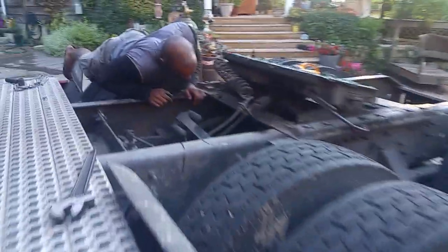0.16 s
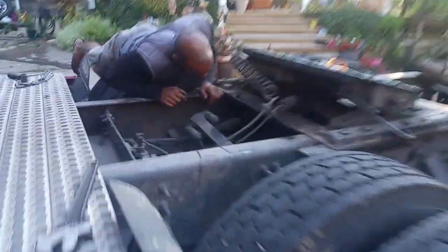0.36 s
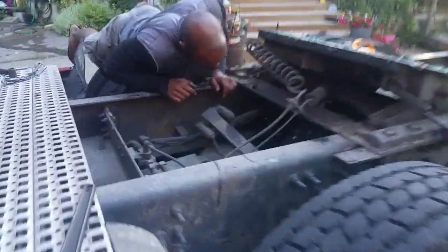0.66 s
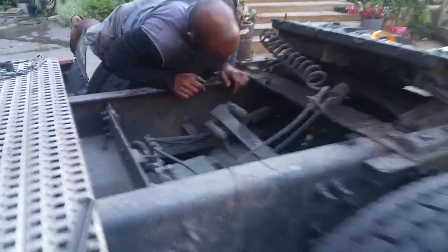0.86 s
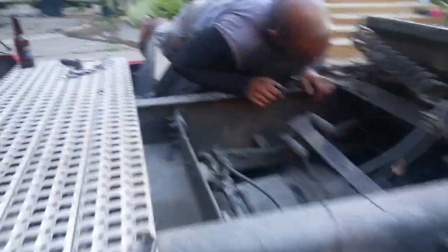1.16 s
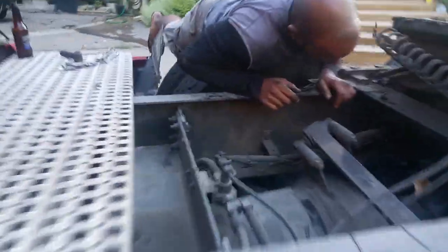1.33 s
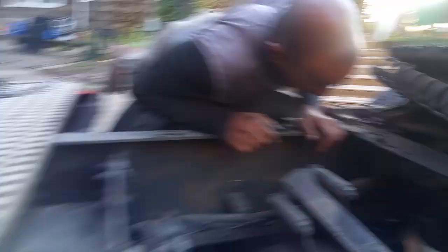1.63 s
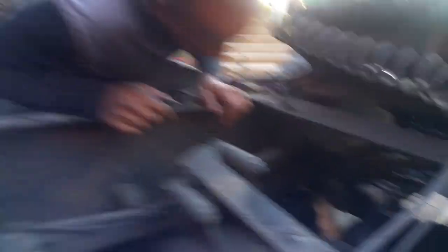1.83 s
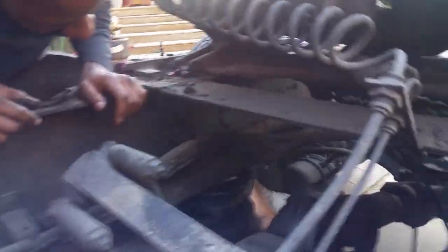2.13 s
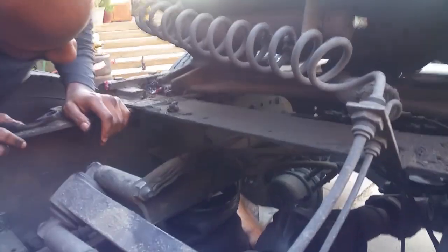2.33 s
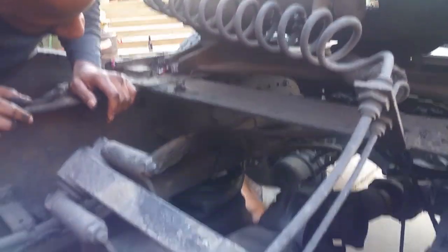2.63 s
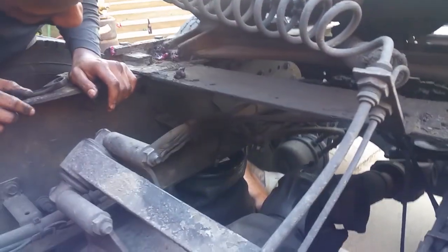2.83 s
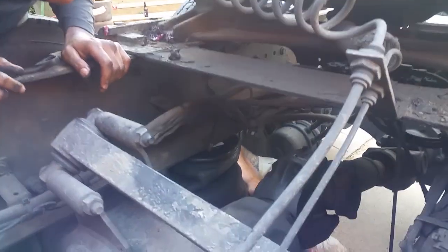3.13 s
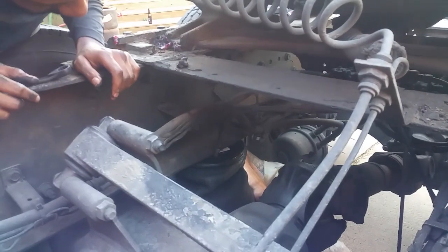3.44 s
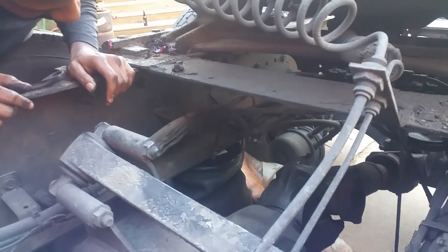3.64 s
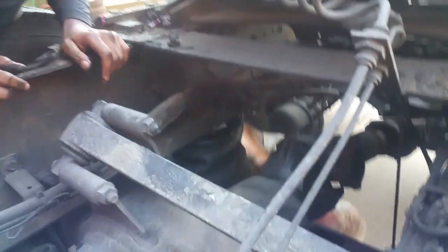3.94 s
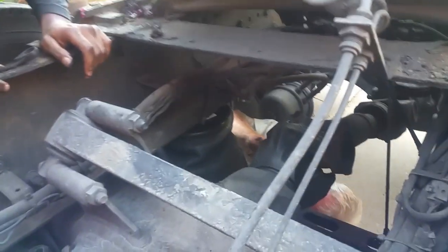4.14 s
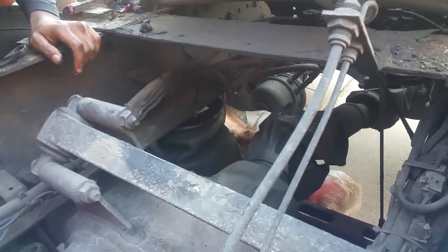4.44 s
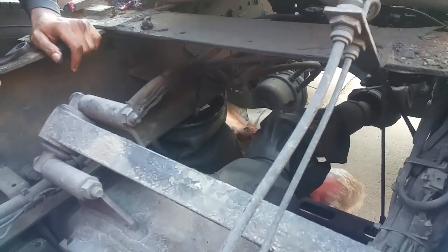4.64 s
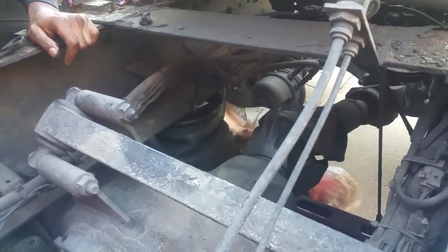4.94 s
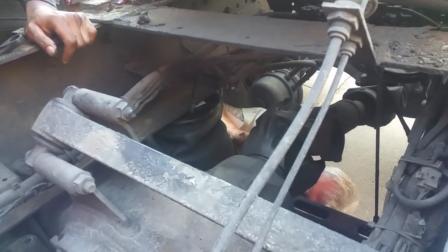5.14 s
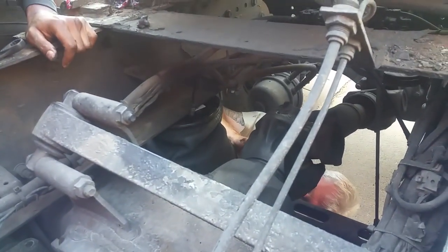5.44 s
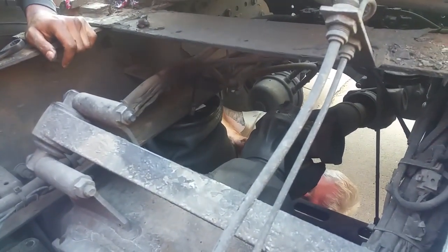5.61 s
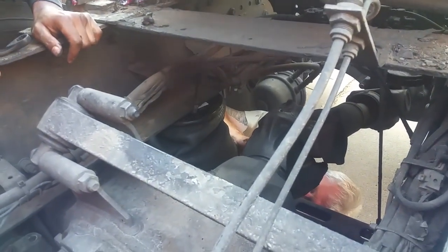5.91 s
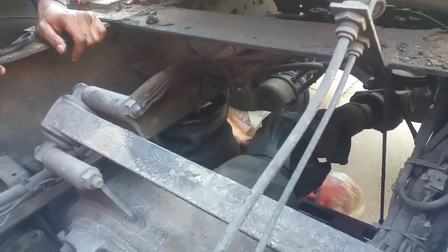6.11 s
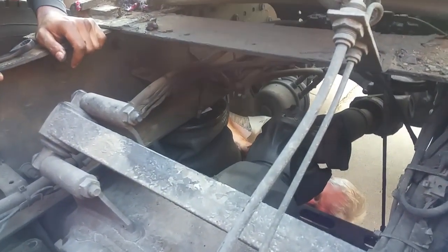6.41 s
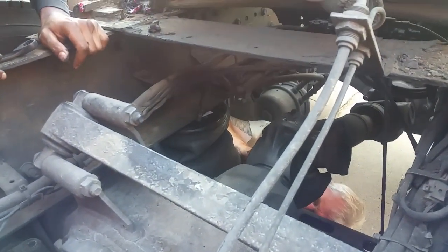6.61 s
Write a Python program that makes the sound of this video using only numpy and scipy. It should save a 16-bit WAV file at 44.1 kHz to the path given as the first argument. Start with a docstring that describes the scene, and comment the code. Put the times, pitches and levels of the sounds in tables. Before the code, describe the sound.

Outdoors in a yard, a handheld stereo microphone approaches a truck chassis leaking compressed air. From 0 s a bright, turbulent hiss is already present, thin and leaning right, over a soft broad low roar. Between about 0.2 and 0.4 s low wind buffets thump mainly on the left; more come at 0.6-0.75 s, together with three quick dull plastic knocks of the handled device near 0.7 s. Further wind bumps and a weak, brighter tick occur around 1.0-1.4 s. The hiss swells steadily, shifting colour as the microphone swings in, and reaches full strength near 2 s. It then holds loud and sizzling to the end at about 6.8 s, wavering slightly around 2.7-4 s, its timbre altering as the microphone tilts. Only faint scattered buffets and light wind remain, with a barely audible low hum around 4.7-5.2 and 5.5-6.2 s.

```python
"""Air escaping from a suspension line

Compressed air leaves a truck's suspension line as a loud turbulent hiss: noise coloured by a jet spectrum.
A hand-held camera walks up, swings over the frame and settles; its pose recolours the hiss at two ports.
Below it lie a broad low roar, wind rumble with decaying-sine buffets, damped modal knocks of the camera
body and a faint narrow-band hum that sounds twice.
"""
import sys
import numpy as np
from scipy import signal
from scipy.io import wavfile
from scipy.ndimage import uniform_filter1d

SR = 44100
rng = np.random.default_rng(int(sys.argv[2]) if len(sys.argv) > 2 else 0)


def digitize_waveform(pressure):
    """Quantize a signal to 16-bit integers and store it at the path in sys.argv[1].

    Rows of a 2-D input are taken as channels; values are limited to [-1, 1].
    """
    field = np.atleast_2d(pressure).T
    bounded = np.clip(field, -1, 1)
    quanta = np.round(bounded * 32767).astype(np.int16)
    wavfile.write(sys.argv[1], SR, quanta)


N = 298557
SIZE, HOP = 1024, 256  # short-time spectrum: window and step (samples)

# Where the camera points; positions between whole numbers blend two poses.
# Each row: time in seconds, pose (0 far, 1 closer, 2 swinging, 3 over the frame, 4 tilted down).
POSE_PATH = [(0, 0), (.45, 0), (.8, 1), (.95, 1), (1.3, 2), (1.72, 2), (2.1, 3), (3.6, 3), (4.4, 4),
             (6.77, 4)]


def gain_of(db):
    """Level law: decibels to an amplitude ratio."""
    return 10 ** (np.asarray(db) / 20)


def evened(x):
    """Power normalization: scales a signal to rms 1."""
    return x / np.sqrt(np.mean(abs(x) ** 2) + 1e-20)


def read(points, hz):
    """Spectral envelope: joins levels linearly along a log-frequency axis."""
    f, value = np.transpose(points)
    return np.interp(np.log(hz + 1), np.log(f + 1), value)


def follow(rows, t):
    """Time envelope: interpolates every column of a curve at the times t."""
    s, *columns = np.transpose(rows)
    return np.array([np.interp(t, s, c) for c in columns])


def add(mix, s, sound):
    """Superposition: sums a sound into the mix at s seconds."""
    part = mix[:, round(s * SR):][:, :sound.shape[1]]
    part += sound[:, :part.shape[1]]


def grid():
    """Short-time analysis grid: bin frequencies in Hz and frame times in seconds."""
    return np.fft.rfftfreq(SIZE, 1 / SR), np.arange(N // HOP + 5) * HOP / SR


def noise_pair(coherence):
    """Partial coherence: two Gaussian noise spectra share a part set by a complex coherence."""
    hz, t = grid()
    a, b, c, d = rng.standard_normal((len(t), len(hz), 4)).T
    right = a + 1j * b
    independent = c + 1j * d
    left = coherence * right + np.sqrt(1 - abs(coherence) ** 2) * independent
    return np.array([left, right])


def sound_of(z, colour_db):
    """Filtered noise: colours spectra at constant expected frame power, returns rms-1 channels."""
    gain = gain_of(colour_db)
    gain_rms = np.sqrt((gain ** 2).mean(-2, keepdims=True))
    x = signal.istft(z * gain / gain_rms, nperseg=SIZE, noverlap=SIZE - HOP)[1]
    return np.array([evened(c[:N]) for c in x])


def smooth_chance(shape, *spans):
    """Correlated randomness: a Gaussian field averaged twice over a span along each axis, rms 1."""
    x = rng.standard_normal(shape)
    for axis, span in enumerate(spans):
        for _ in range(2):
            x = uniform_filter1d(x, int(span), axis)
    return evened(x)


def pose_share():
    """Linear crossfade: the share of each of five poses in each frame."""
    return np.maximum(1 - abs(follow(POSE_PATH, grid()[1]) - np.arange(5)[:, None]), 0)


def hum():
    """Narrow-band noise: a one-pole random envelope shifted to the hum frequency, alike at both ports."""
    # The faint hum. Each row: middle of the fade-in in seconds, middle of the fade-out in seconds, level in dB.
    hum_spans = [(4.65, 5.2, -56), (5.5, 6.25, -52)]
    centre_hz, width_hz, fade_s = 154.6, 2.8, .2
    t = np.arange(N) / SR
    pole = np.exp(-np.pi * width_hz / SR)
    drive = rng.standard_normal(N) + 1j * rng.standard_normal(N)
    envelope = signal.lfilter([1], [1, -pole], drive)
    tone = (envelope * np.exp(2j * np.pi * centre_hz * t)).real
    level = 0
    for start, end, db in hum_spans:
        level = level + gain_of(db) * np.clip(np.minimum(t - start, end - t) / fade_s + .5, 0, 1)
    return evened(tone) * level


def wind(lumpy_db=2.5):
    """Turbulent pressure: lumpy low-frequency noise, incoherent between the ports."""
    # Wind, strong while the camera moves, a light breeze after.
    # Each row: time in seconds, left level in dB, right level in dB, both before the lumps.
    wind_levels = [(0, -43.5, -49), (.7, -36, -47), (1, -43, -48), (1.4, -42.5, -49), (1.75, -53, -58),
                   (4.5, -65, -57), (5.3, -51, -55), (5.7, -63, -57), (6.77, -58, -52)]
    # Spectrum of the rumble. Each row: frequency in Hz, relative density in dB per Hz.
    wind_spectrum = [(20, -24), (45, -4), (70, 4.5), (130, -12), (250, -7), (500, -35), (1000, -60)]
    rumble = sound_of(noise_pair(0), read(wind_spectrum, grid()[0])[None, :, None])
    lumps = lumpy_db * smooth_chance((N, 2), 500).T
    return rumble * gain_of(follow(wind_levels, np.arange(N) / SR) + lumps)


def roar(coherence, patchy_db=1.5):
    """Broadband low noise of jet and yard: partly coherent at the ports, louder over the frame."""
    # Spectrum of the roar. Each row: frequency in Hz, relative density in dB per Hz.
    roar_spectrum = [(25, -24), (60, -3), (140, -3.5), (300, -3), (680, 0), (1100, 0), (1550, -1),
                     (1900, -10), (2600, -12), (4000, -60)]
    # Balance of the ports within the spectrum. Each row: frequency in Hz, left over right in dB.
    roar_balance = [(60, 1), (250, -3), (600, -4), (1100, -4.5), (1600, -2)]
    far_db, near_gain_db = [[-41.5], [-39]], 1.78  # left and right level from afar, gain over the frame
    hz, t = grid()
    z = noise_pair(coherence)
    z *= gain_of(patchy_db * smooth_chance((len(t), len(hz)), 10, 5).T)
    side = np.array([.5, -.5])[:, None] * read(roar_balance, hz)
    x = sound_of(z, (read(roar_spectrum, hz) + side)[:, :, None])
    near = np.clip(follow(POSE_PATH, np.arange(N) / SR) - 2, 0, 1)
    return x * gain_of(far_db + near_gain_db * near)


def faint_buffets(count=14):
    """Random eddies: uniform times and levels, log-uniform frequencies, all leaning left."""
    typical_db, spread_db, lean_db = -34.5, 1, 4  # middle level, deviation either way, mean left over right
    low_hz, high_hz = 72, 180
    when, size, pitch, side = rng.random((count, 4)).T
    level_db = typical_db + spread_db * (2 * size - 1)
    hz = low_hz * (high_hz / low_hz) ** pitch
    return list(zip(when * N / SR, level_db, hz, 2 * side * lean_db))


def buffets(swings=1.04, rise_cycles=.3):
    """Transient response: each eddy pushes the diaphragm, a sine under a Gaussian decay."""
    # Strong buffets. Each row: start in seconds, level in dB of the sine before its envelope,
    # frequency in Hz, left over right in dB.
    strong_buffets = [(0.168, -26, 86.1, 16), (0.25, -21, 94.2, 22), (0.29, -26, 105, 14),
                      (0.309, -18, 83.4, 25), (0.338, -22, 140, 15), (0.359, -23, 205, 20),
                      (0.614, -23, 129, 17.5), (0.639, -17.5, 300, 24), (0.691, -27, 164, 15),
                      (0.728, -20, 88.8, 19), (1.018, -23, 127, 20.5), (1.029, -17.5, 230, 21),
                      (1.179, -25, 132, -14), (1.319, -26, 99.6, 15), (1.369, -29, 99.6, -14),
                      (2.632, -28, 259, 5), (3.31, -29, 62, 12), (3.327, -30, 127, 16),
                      (4.229, -28, 143, 14), (4.829, -31, 91.5, 17), (5.358, -30, 110, 6.5),
                      (5.479, -33, 70, 9)]
    out = np.zeros((2, N))
    for s, db, hz, pan_db in strong_buffets + faint_buffets():
        turns = hz * np.arange(4000) / SR
        # the Gaussian falls to 1/e after "swings" cycles
        envelope = np.exp(-(turns / swings) ** 2) * np.minimum(turns / rise_cycles, 1)
        port_db = db + np.minimum([[pan_db], [-pan_db]], 0)  # only the weaker port is lowered
        add(out, s, np.sin(2 * np.pi * turns) * envelope * gain_of(port_db))
    return out


def knocks(rise_s=.003, rattle=.3):
    """Modal decay: damped sines of the plastic body, roughened by loose parts, alike at both ports."""
    # Knocks. Each row: start in seconds, level in dB, extra level in dB of the modes above the first.
    knock_rows = [(0.667, -17, -7), (0.685, -20.5, -9), (0.706, -17, -10), (1.124, -30, 8)]
    # Modes of the camera body. Each row: frequency in Hz, relative level in dB, 60 dB decay time in seconds.
    body_modes = [(733, 4, 0.024), (1175, -1, 0.03), (1386, -1.5, 0.032)]
    out, t = np.zeros((2, N)), np.arange(2500) / SR
    for s, db, bright_db in knock_rows:
        ring = np.zeros(len(t))
        for k, (hz, mode_db, t60) in enumerate(body_modes):
            level_db = mode_db + min(k, 1) * bright_db - 60 * t / t60
            ring += gain_of(level_db) * np.sin(2 * np.pi * hz * t)
        ring *= 1 + rattle * smooth_chance(len(t), 30)
        add(out, s, gain_of(db) * ring * np.minimum(t / rise_s, 1) * gain_of([[-.5], [.6]]))
    return out


def port_relation(likeness=1.2, least=.08, wander=.2):
    """Interference: delayed copies sum to a complex coherence; its phase strays at random."""
    # Delayed copies that set how alike the ports are. Each row: lead of the left port in milliseconds,
    # then the relative weight far or closer, swinging, and over the frame or tilted.
    copy_rows = [(1.279, 0.04, -0.0, -0.05), (0.783, -0.09, -0.08, -0.09), (0.67, -0.06, -0.12, 0.02),
                 (0.603, -0.08, -0.0, -0.05), (0.453, 0.12, -0.02, 0.02), (0.292, 0.01, 0.07, 0.15),
                 (0.215, 0.11, -0.0, -0.13), (0.152, -0.01, 0.14, 0.01), (0.066, 0.0, 0.03, 0.15),
                 (0.035, 0.16, -0.01, -0.05), (-0.009, 0.08, -0.09, 0.1), (-0.072, -0.02, 0.14, 0.01),
                 (-0.168, 0.07, 0.11, 0.02), (-0.233, -0.0, 0.14, -0.02), (-0.391, 0.05, 0.01, 0.09),
                 (-0.526, -0.02, 0.09, -0.03), (-0.799, -0.02, 0.04, -0.06), (-1.544, 0.02, 0.01, 0.07)]
    hz, copies, share = grid()[0], np.array(copy_rows), pose_share()
    weights = copies[:, [1, 1, 2, 3, 3]] @ share
    total = np.exp(2j * np.pi * hz[:, None] * copies[:, 0] / 1000) @ weights
    stray = wander * smooth_chance((len(hz), len(share)), 4) @ share  # radians
    return np.clip(least + likeness * abs(total), 0, .8) * np.exp(1j * (np.angle(total) + stray))


def port_colour(jet, humps, share, ripple_db):
    """Spectral shaping: jet spectrum plus humps and a fine random ripple, blended between poses."""
    hz, humps = grid()[0], np.array(humps)
    shapes = np.exp(-2 * ((hz[:, None] - humps[:, 0]) / humps[:, 1]) ** 2)
    ripple = ripple_db * smooth_chance((len(hz), len(share)), 2)
    return read(jet, hz)[:, None] + (shapes @ humps[:, 2:] + ripple) @ share


def hiss(coherence, ripple_db=1.9, patchy_db=.8, tremor_db=.9, flutter_db=.25):
    """Turbulent jet noise: patches drift, hand tremor sways the treble, the jet itself flutters."""
    # Hiss as the camera nears, turns and sways. Each row: time in seconds, left level in dB, right level in dB.
    hiss_levels = [(0, -29.7, -23), (.3, -28, -19), (.6, -25, -17.5), (1.1, -22.5, -16.5),
                   (1.65, -23.5, -14), (2.05, -22.8, -12), (2.68, -22, -12.5), (2.85, -24, -13.5),
                   (3.03, -21.8, -12.4), (3.45, -24, -13.5), (3.65, -22.5, -12.5), (4.03, -23, -13.2),
                   (4.8, -22, -12.5), (4.97, -22, -13), (5.25, -22, -12.5), (6.2, -23, -12.6),
                   (6.45, -22, -11.7), (6.77, -23, -13)]
    # Broad jet spectrum at each port. Each row: frequency in Hz, relative density in dB per Hz.
    left_jet = [(500, -55), (1200, -22.6), (1800, -12.5), (2500.0, -9.5), (4000.0, -4.9), (6000.0, -9.2),
                (8000.0, -8.4), (11000.0, -8.2), (13500.0, -13.3), (15900.0, -17.1)]
    right_jet = [(500, -55), (1200, -31.8), (1800, -23.0), (2500.0, -21.0), (4000.0, -10.2), (6000.0, -7.7),
                 (8000.0, -6.4), (11000.0, -13.3), (13500.0, -17.3), (15900.0, -23.1)]
    # Humps and dips from frame and camera body. Each row: centre in Hz, width in Hz (two standard deviations),
    # then the height in dB far, closer, swinging, over the frame and tilted down.
    left_humps = [(2600, 180, -0.7, -1.7, -1.0, 2.7, 1.2), (3350, 340, -3.1, -2.9, 0.7, 2.4, 1.0),
                  (3600, 350, -1.3, 0.8, -1.1, -3.1, -3.7), (4420, 560, 5.3, 4.1, 3.4, 2.7, 0.8),
                  (4950, 340, 2.3, 6.0, 1.8, 2.6, 2.5), (5590, 690, 6.9, 6.8, 5.2, 6.2, 6.0),
                  (6130, 190, 3.6, 1.3, 2.2, 3.4, 1.8), (6800, 230, 1.4, -0.1, -1.2, -4.6, -4.8),
                  (7190, 200, -2.9, 0.5, 0.0, 3.0, 2.0), (7420, 130, -0.7, 0.3, -0.1, -5.0, -4.3),
                  (8490, 480, -3.0, -0.7, -1.7, -0.1, 1.8), (9290, 800, -1.2, -1.0, -4.4, -3.4, -2.5),
                  (9980, 540, 0.7, 0.3, -1.7, 3.0, 0.3), (11040, 360, -2.8, -1.6, -1.2, 1.1, 5.6),
                  (11900, 1330, -6.2, -3.9, -4.8, -2.2, -0.6), (13170, 840, 5.1, 4.9, 5.4, 5.5, 3.3),
                  (14260, 850, -3.5, -0.3, -2.4, 4.1, 5.8), (15250, 410, -2.1, -2.8, -0.8, 2.2, 2.7)]
    right_humps = [(2530, 370, 2.8, 0.8, 3.9, 1.0, 0.9), (3100, 530, 4.2, 3.7, 2.6, 1.8, 0.9),
                   (3940, 420, 1.9, -0.6, -2.7, -3.2, -4.4), (4500, 250, 7.2, 1.0, -1.9, -0.9, 1.6),
                   (4990, 190, 3.0, -0.3, -0.2, -4.0, -3.0), (5190, 930, -2.2, -0.5, 5.5, 0.0, 0.9),
                   (5250, 200, 3.8, -1.9, 0.7, -1.8, 2.0), (6080, 630, -1.6, 0.3, 0.4, -5.4, -7.8),
                   (6460, 200, -1.3, -5.7, 0.9, 2.3, 2.6), (7280, 780, 5.6, 3.1, -1.1, 5.0, 3.1),
                   (7780, 470, 2.3, 2.6, 1.8, 3.1, 2.6), (7970, 130, 1.7, -0.7, 0.8, -2.0, -0.5),
                   (8770, 1160, -4.4, -8.3, -1.8, 0.8, 0.9), (10110, 290, 10.3, 7.6, 7.1, 1.2, -0.9),
                   (10600, 380, 3.1, 5.9, 5.6, 0.2, -2.0), (10770, 1480, -0.4, -1.6, 1.0, 2.4, 7.8),
                   (12110, 750, -3.1, -7.3, -1.9, -3.6, -3.8), (13270, 940, 3.1, 1.8, 8.0, 0.9, -0.4),
                   (13540, 200, 0.2, 0.5, -2.0, 3.4, 2.9), (15330, 690, 1.8, -1.0, -1.6, 0.6, 3.3)]
    (hz, t), share = grid(), pose_share()
    colour = np.array([port_colour(left_jet, left_humps, share, ripple_db),
                       port_colour(right_jet, right_humps, share, ripple_db)])
    patches = smooth_chance((len(t), len(hz), 2), 12, 5).T
    # the tremor grows with frequency and has its stated depth at 13 kHz
    tremor = smooth_chance((len(t), len(hz), 2), 18, 50).T * hz[:, None] / 13000
    flutter = smooth_chance(len(t), 5)
    sway_db = patchy_db * patches + tremor_db * tremor + flutter_db * flutter
    z = noise_pair(coherence) * gain_of(sway_db)
    return sound_of(z, colour) * gain_of(follow(hiss_levels, np.arange(N) / SR))


def scene():
    """Superposition: the pressures of all sources sum at the two ports."""
    coherence = port_relation()
    background = hum() + wind() + roar(coherence)
    return background + buffets() + knocks() + hiss(coherence)


def record(dry):
    """Microphone response: a deep-bass roll-off, soft saturation, then a linear-phase band limit."""
    rolled = signal.sosfilt(signal.butter(2, 45, "high", fs=SR, output="sos"), dry)
    soft = 1.5 * np.tanh(rolled / 1.5)
    edge_hz = 15740
    band_limit = signal.firwin(1023, edge_hz, window=("kaiser", 9), fs=SR)
    return signal.oaconvolve(soft, band_limit[None], "same")


dry = scene()
out = record(dry)
digitize_waveform(out)
```